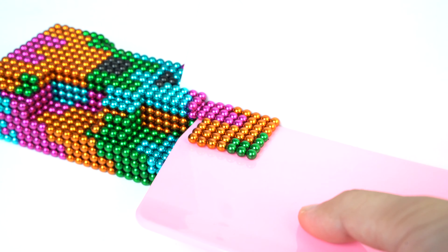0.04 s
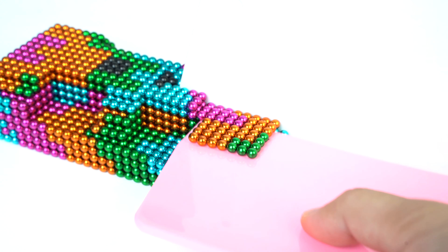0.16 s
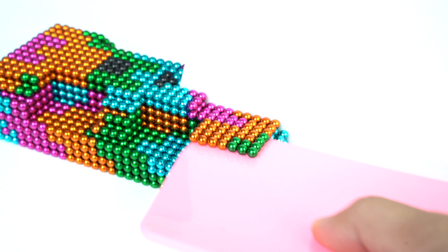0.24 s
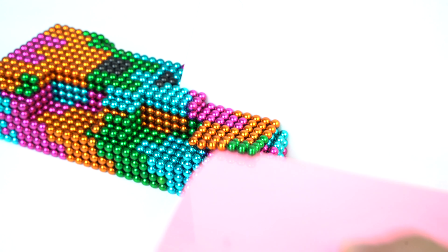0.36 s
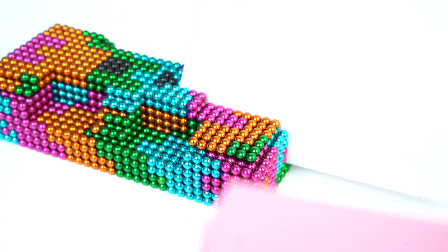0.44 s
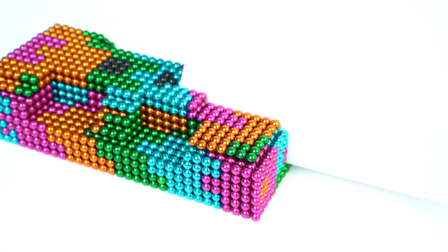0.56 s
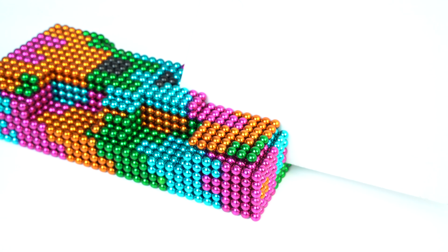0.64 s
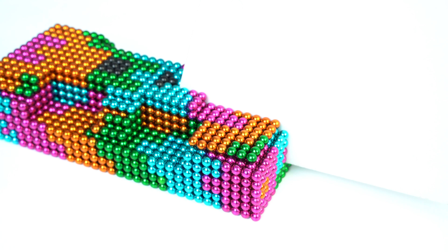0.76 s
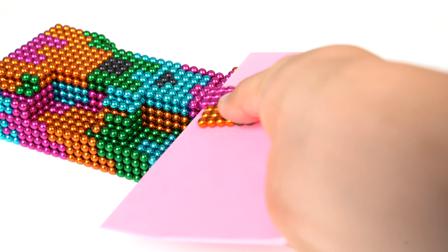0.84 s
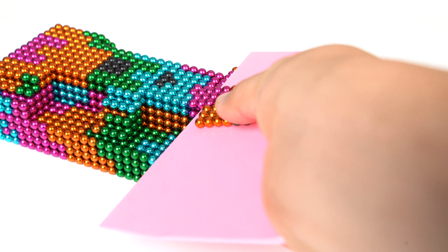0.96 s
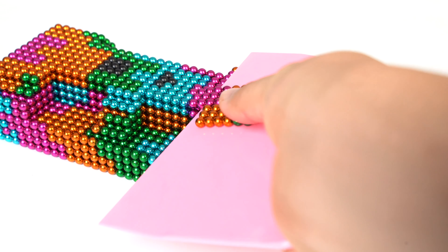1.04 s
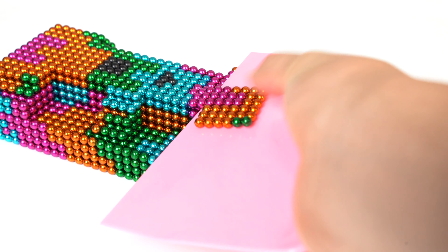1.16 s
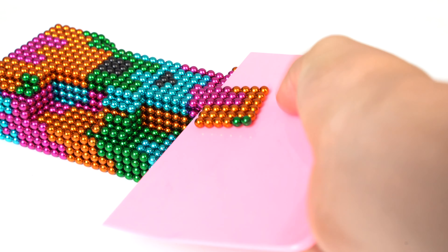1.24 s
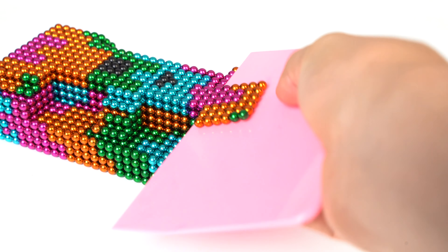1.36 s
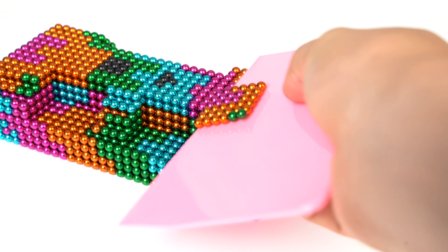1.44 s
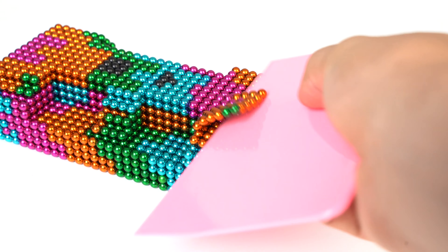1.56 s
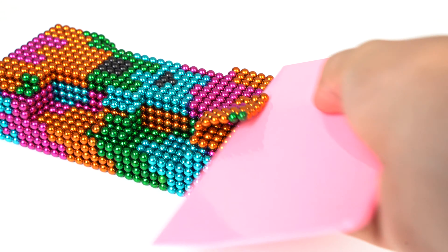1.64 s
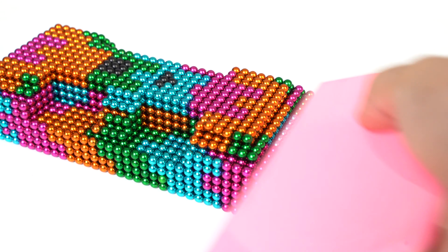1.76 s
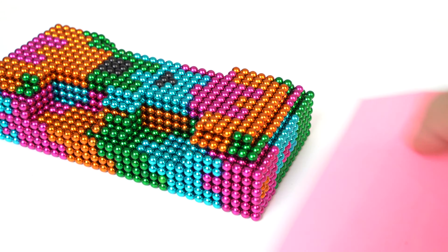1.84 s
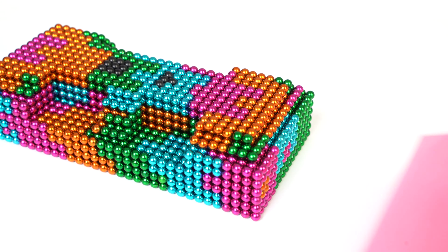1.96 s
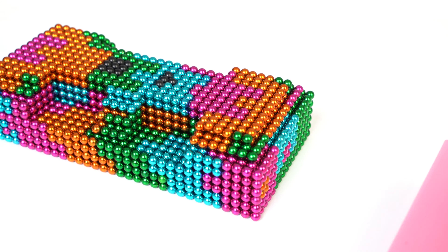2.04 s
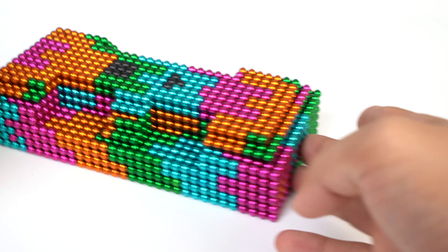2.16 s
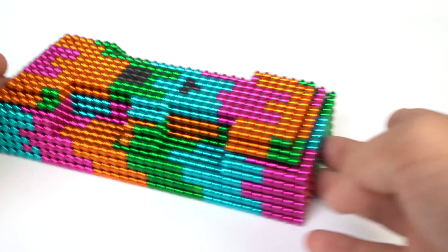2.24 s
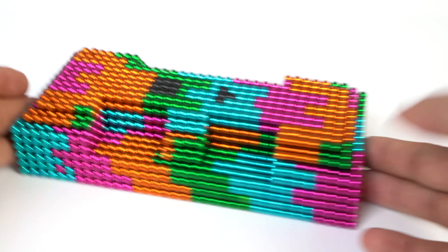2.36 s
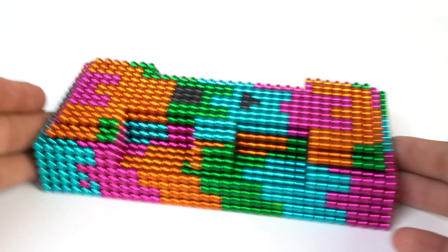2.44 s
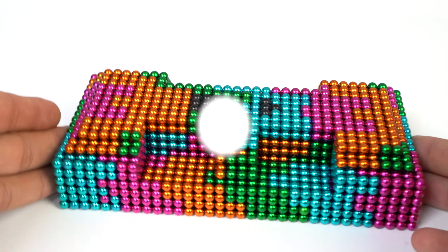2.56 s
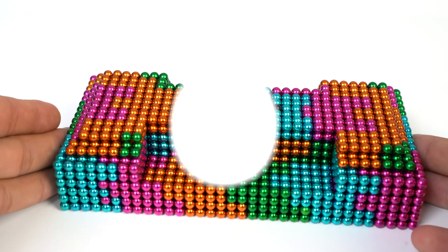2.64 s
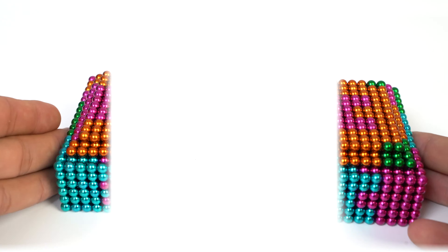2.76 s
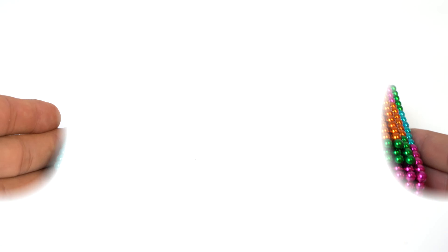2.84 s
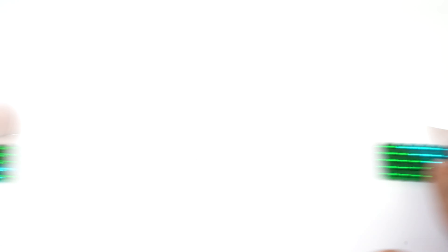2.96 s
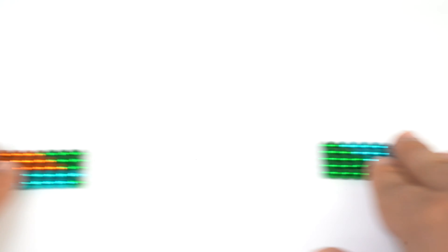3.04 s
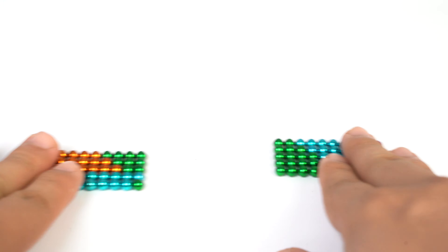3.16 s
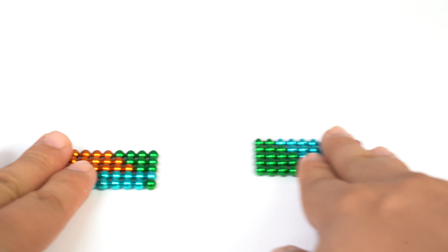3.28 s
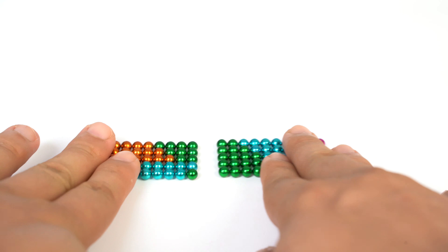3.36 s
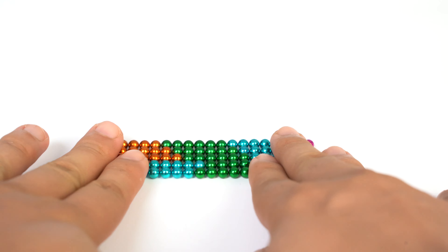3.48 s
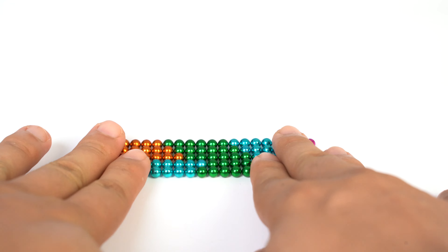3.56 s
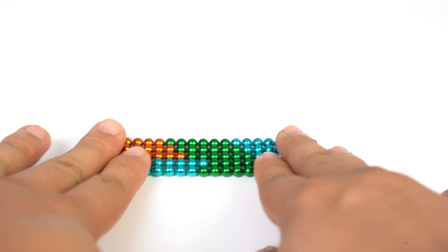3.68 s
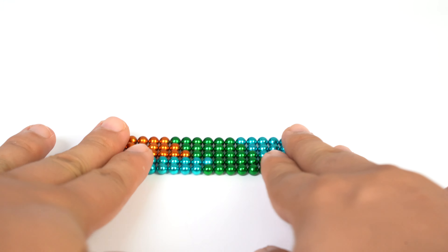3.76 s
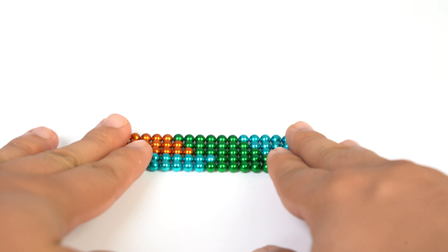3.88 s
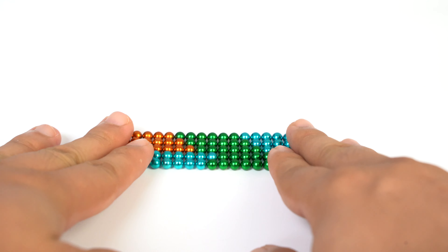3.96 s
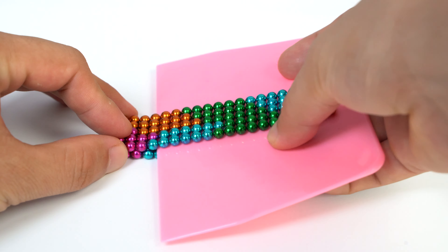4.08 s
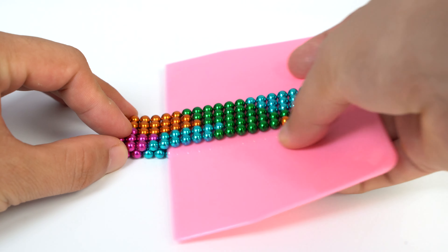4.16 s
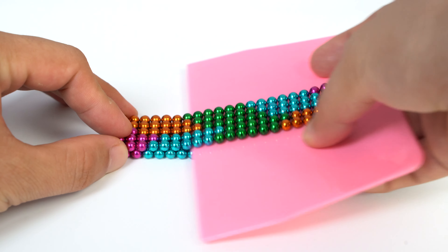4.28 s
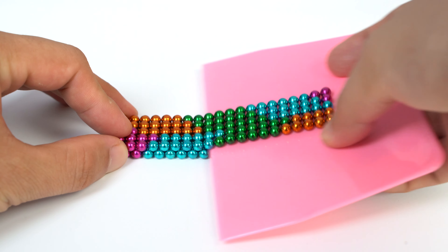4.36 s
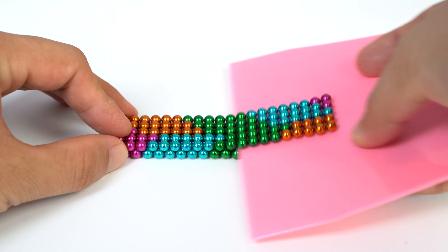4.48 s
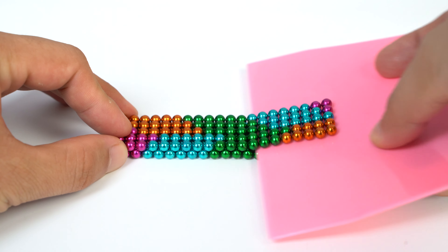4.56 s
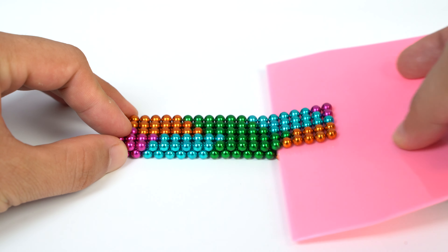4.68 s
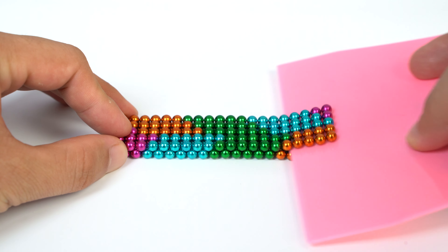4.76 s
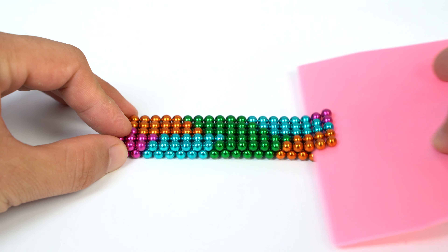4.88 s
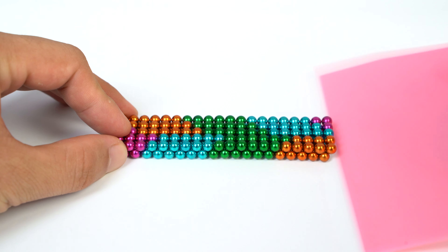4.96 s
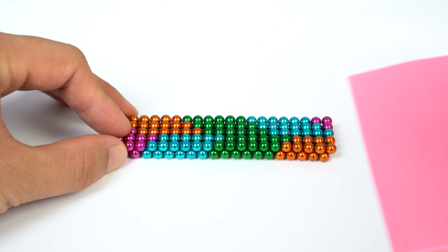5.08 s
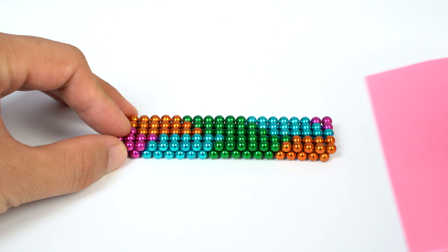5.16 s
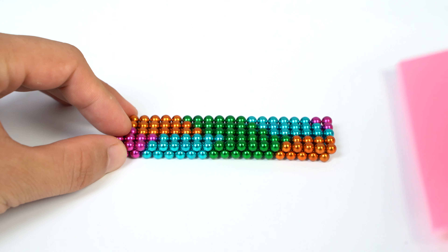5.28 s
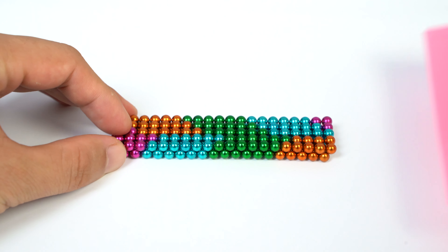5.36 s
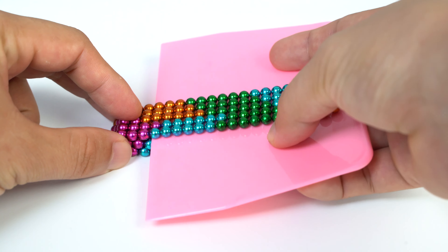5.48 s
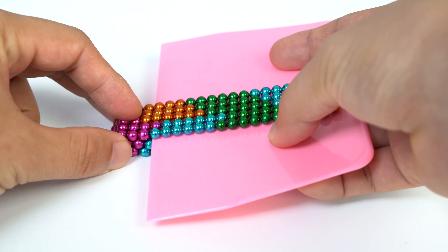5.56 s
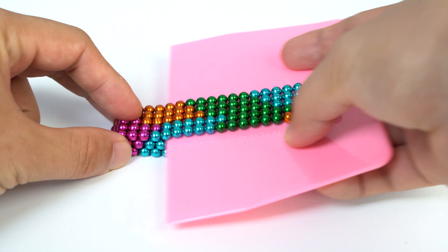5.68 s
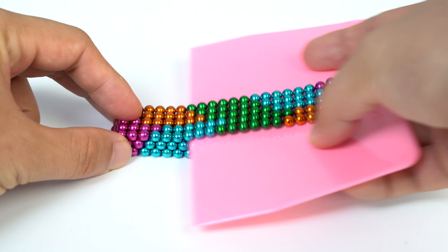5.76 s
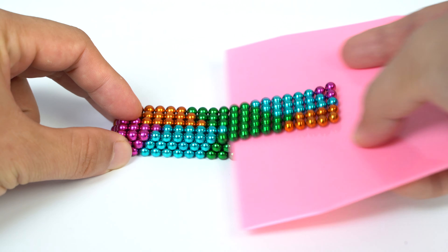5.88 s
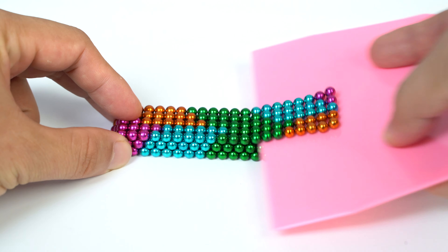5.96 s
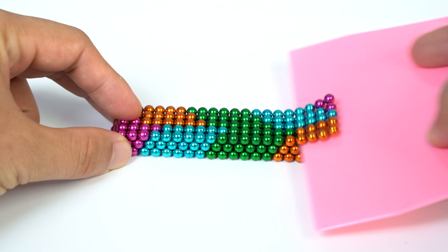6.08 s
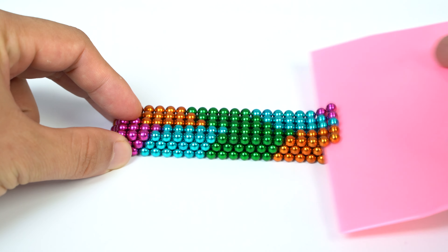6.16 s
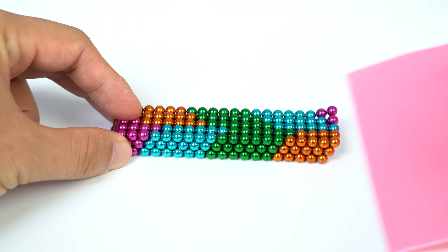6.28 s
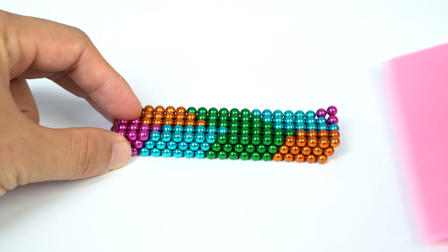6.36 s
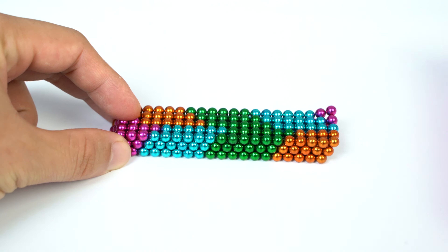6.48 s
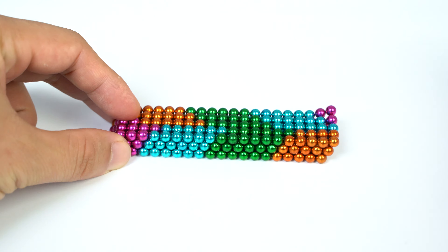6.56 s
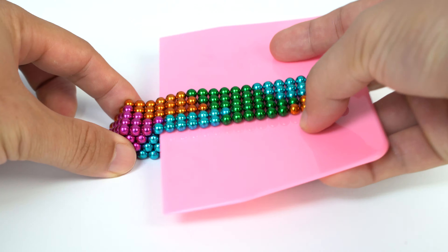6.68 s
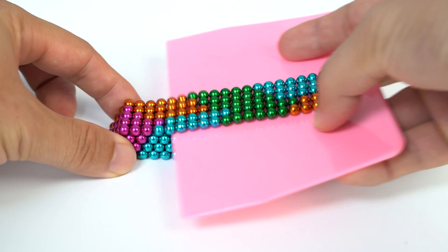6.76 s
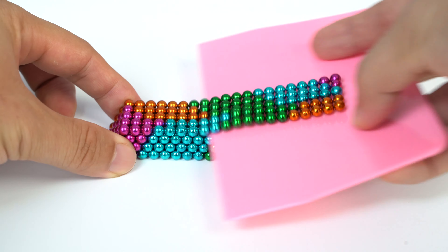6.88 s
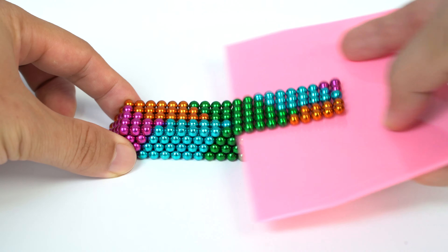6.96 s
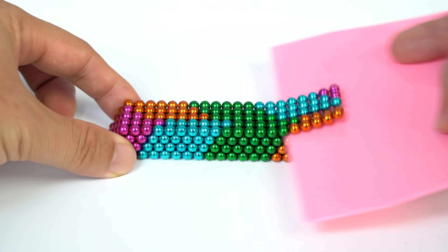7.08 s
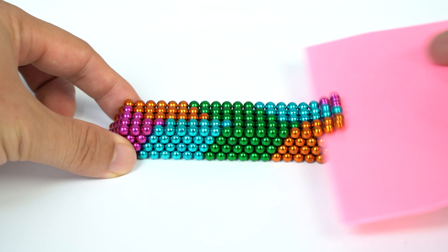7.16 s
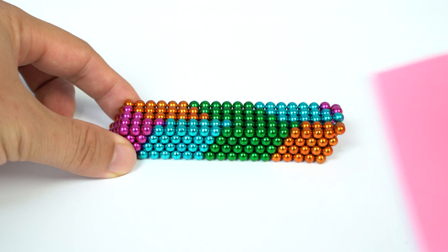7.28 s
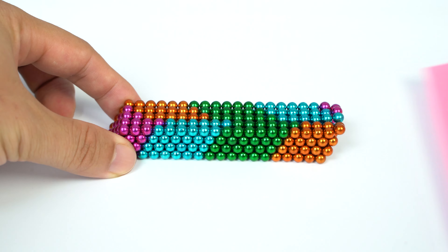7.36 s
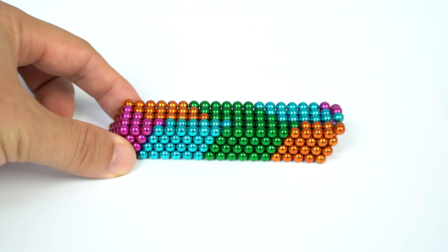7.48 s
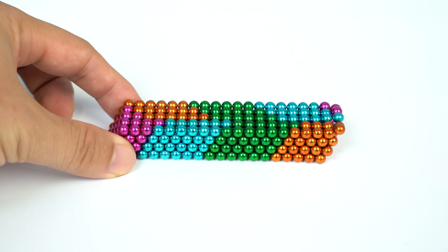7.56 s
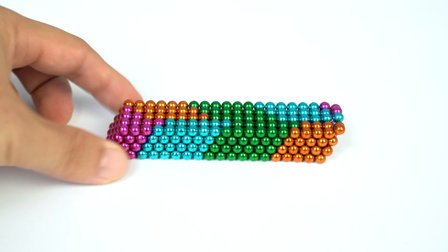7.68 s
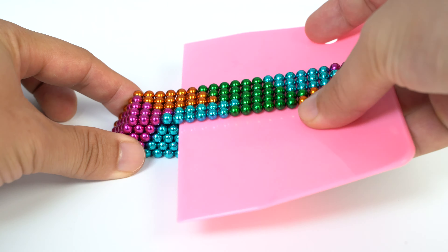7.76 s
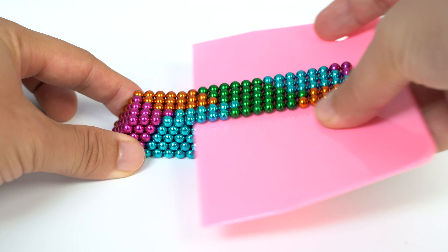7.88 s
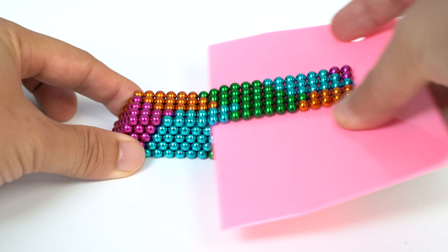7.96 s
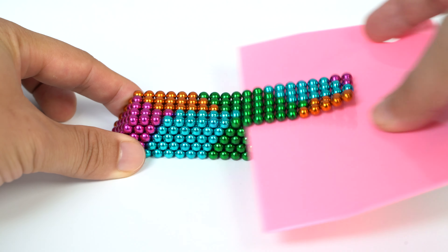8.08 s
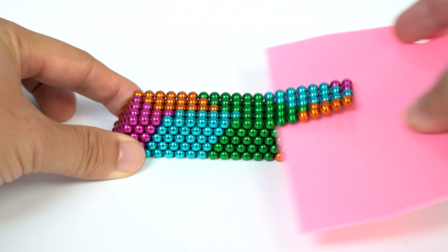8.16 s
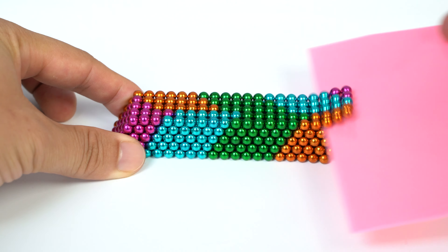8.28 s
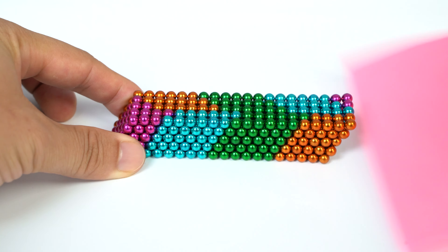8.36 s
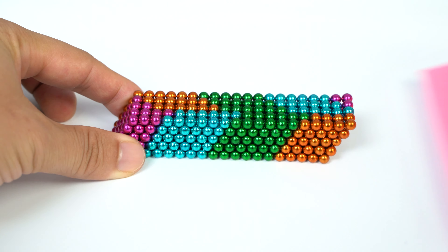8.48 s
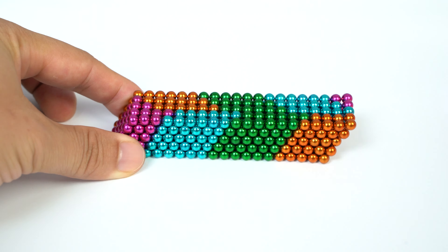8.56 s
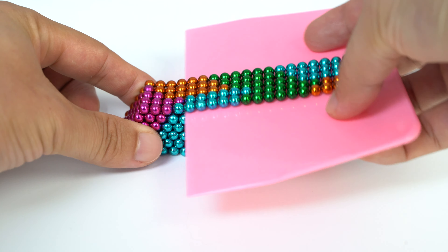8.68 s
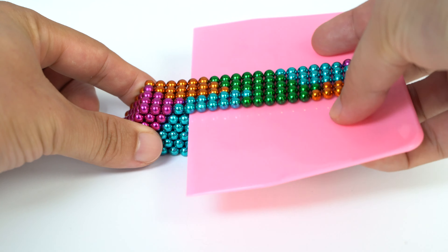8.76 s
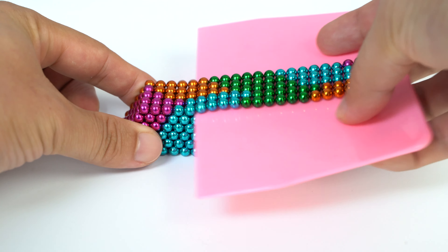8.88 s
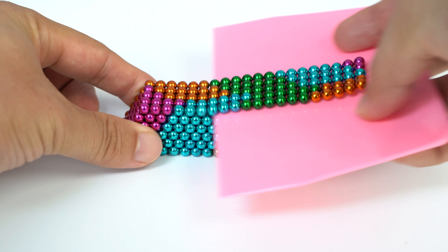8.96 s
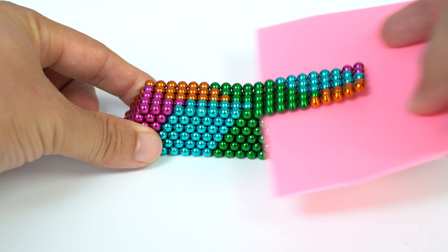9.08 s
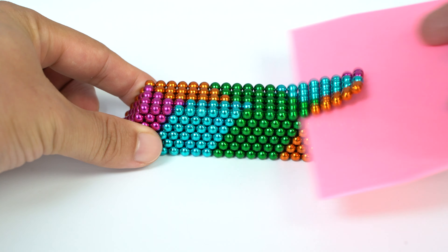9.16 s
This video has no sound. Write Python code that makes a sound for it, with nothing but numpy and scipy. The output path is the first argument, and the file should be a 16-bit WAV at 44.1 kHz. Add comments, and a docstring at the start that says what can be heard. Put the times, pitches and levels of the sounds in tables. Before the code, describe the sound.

A bright plastic-and-steel rattle, very close and dry: a quick ratchet of clicks, a tiny burst, a few lone ticks, another ratchet. A heavy block slides dully over the table, two light strips scrape and click together, then four long dense bursts of snapping balls, a short double clack between the last ones. Small room tail, hard cuts, the loudest snaps slightly distorted.

```python
"""A small room, the microphone close to a table top: layers of small magnetic steel balls and a plastic card.
The card is drawn out from between two layers; row after row snaps shut, ringing card and table (noise bursts
through resonances). Filtered random slips make the block, the two strips and the fingers on the table; noise
through resonances makes the card's edge. Far off, two horns sound as sums of sines, over hiss and deep rumble.
Noise tails make the room's answer; hard edits cut them short and the loudest snaps clip."""
import sys
import numpy as np
from scipy import signal
from scipy.fft import rfft, irfft, next_fast_len
from scipy.io import wavfile
from scipy.ndimage import uniform_filter1d

SR = 44100
rng = np.random.default_rng(int(sys.argv[2]) if len(sys.argv) > 2 else 0)


def to_wav(sig):
    """Store sig (one row per channel, or 1-D mono) as 16-bit WAV at the path in sys.argv[1].

    Samples outside -1..1 are clipped; the rate is SR.
    """
    pcm = np.clip(np.atleast_2d(sig), -1, 1) * 32767
    pcm = np.round(pcm).astype(np.int16)
    wavfile.write(sys.argv[1], SR, pcm.T)  # frames by channels


N = 407043  # length in samples

# The small room by bands: [f/Hz, t60/s, level/dB]
ROOM_BANDS = [(162, 0.74, 7), (278, 0.5, 7), (517.7, 0.58, 4.5), (1190, 0.24, 9), (2610, 0.38, 0),
              (5200, 0.5, -7.5), (9800, 0.41, -9)]
ROOM_DB = -15  # before the level of each section
# Hard edits, start of each section: [t/s]
EDITS = [0, .87, 1.5, 2.152, 2.833, 3.432, 4.075, 5.51, 6.672, 7.85, 8.665, 8.94]
# Room level in each section, the microphone stands nearer or further: [level/dB]
SECTION_ROOM = [-3, -1, -2.5, -3, -1, 0, 1.5, 1.5, 1.5, 0, 0.5, 2]

# Faint hiss of the room, its colour: [f/Hz, level per Hz/dB]
AIR_COLOUR = [(200, -22.5), (800, -2), (3000, -4.5), (16000, -19)]
AIR_DB = -65
# Gaps in the hiss: [start t/s, end t/s]
AIR_GAPS = [(0, .17), (.87, .915), (3.432, 3.5), (4.075, 4.16), (5.51, 5.69), (6.672, 6.76)]

# Deep rumble, its colour: [f/Hz, level per Hz/dB]
RUMBLE_COLOUR = [(20, -29), (70, 5.5), (110, 6), (300, -67)]
# Its slow bed: [t/s, level/dB]
RUMBLE_BED = [(0, -72), (1.7, -80.5), (2.3, -60), (4.1, -72.5), (4.7, -42.5), (5.6, -67), (6.5, -68),
              (7, -93.5), (9.23, -83)]
RUMBLE_PULL_DB = -23.5  # the pulling hand shakes the table

# Two far horns: [start t/s, end t/s, level/dB, fall/dB per s]
HORN_BLASTS = [(6.27, 6.672, -44, 0), (6.672, 6.84, -57, -31)]
# Their overtones before the buzz level and the waver: [multiple of the pitch, level/dB]
HORN_OVERTONES = [(2, -23), (6, -22), (7, -12.5), (8, -7), (9, -10.5), (10, -15.5)]
# Buzz of the overtones, first and second horn: [level/dB]
HORN_BUZZ = [0, -31]
HORN_HZ, SECOND_HORN_HZ, SECOND_HORN_S = 440.5, 393, 6.672

# A short ping with its overtone, the thud of a dropped layer, a hollow knock:
# [t/s, f/Hz, t60/s, level/dB, sag/Hz per s]
SINGLE_RINGS = [(.872, 957, 0.28, -35.5, 2100), (.872, 1670, .3, -51, 500), (1.805, 106, 0.63, -39, 5),
                (8.697, 575, 0.17, -20.5, 39)]

# Resonances of the table top: [f/Hz, width/Hz, level/dB]
TABLE_MODES = [(112, 4.3, -12.5), (226.9, 24, 4.5), (323, 41, -3), (416.2, 16, 0.5), (576.7, 73, -5.5),
               (684, 26, 6), (828.6, 64, 0.5), (970, 13, -20.5), (1210, 51, -9)]
# Resonances of the card, the first being its usual pitch: [f/Hz, width/Hz, level/dB]
CARD_MODES = [(1800, 785, 1), (3327, 500, 2), (4044, 710, 0.5), (6720, 2200, -10.5), (11800, 5000, -37)]
CARD_Q = 5  # sharpness of the lowest mode in a snap
# Resonances of the thick block under the first layers: [f/Hz, width/Hz, level/dB]
BLOCK_MODES = [(378, 70, -6.5), (444, 17, 10.5), (620, 210, -1.5)]
BLOCK_KNOCK_DB = -24.5  # thud against the snap's level
# Layers that close down on the block: [start t/s, end t/s]
ON_BLOCK = [(.2, .5), (1.5, 1.85)]

# Fingers brush the table; a negative fall rises: [start t/s, end t/s, level/dB, fall/dB per s]
FINGER_STROKES = [(3.435, 3.53, -61, -250), (3.76, 4.075, -44, 55), (5.3, 5.52, -52.5, 42),
                  (7.55, 7.85, -63, 64.5)]
# Colour of the finger rub: [f/Hz, level per Hz/dB]
FINGER_COLOUR = [(120, -23.5), (200, -16.5), (318, -17.5), (513, -39), (787, 4), (951, -50), (1360, -5),
                 (1560, -31.5), (12000, -43.5), (15600, -74.5), (22000, -120)]
# The card's edge brushes the table; a negative fall rises: [start t/s, end t/s, level/dB, fall/dB per s]
CARD_STROKES = [(.61, .87, -38, 40), (1.36, 1.5, -63, -13), (5.06, 5.3, -41.5, 14)]
# Resonances of the brushing card: [f/Hz, width/Hz, level/dB]
CARD_SLIDE_MODES = [(1050, 150, -8), (1900, 400, 0), (3150, 400, -2), (4500, 600, -3), (6900, 1100, 0),
                    (11000, 8000, -12)]
# Two strips pushed over the table: [t/s, level/dB]
STRIPS_PUSH = [(2.835, -54), (2.9, -28.5), (2.97, -17), (3.03, -13), (3.13, -15), (3.2, -19), (3.28, -32),
               (3.4, -27), (3.43, -30.5)]
# The strips jerk together and settle: [t/s, level/dB]
STRIPS_JERK = [(3.5, -76), (3.535, -23), (3.56, -29.5), (3.7, -52)]
# Colour of the strips' rub: [f/Hz, level per Hz/dB]
STRIPS_COLOUR = [(59, -71.5), (100, -31.5), (818, -2), (970, -7), (1360, 2.5), (1520, -3.5), (1910, -0.5),
                 (16000, -30.5)]
# The block pushed over the table: [t/s, level/dB]
BLOCK_PUSH = [(2.155, -42), (2.2, -27.5), (2.26, -14.5), (2.33, -11.5), (2.45, -9), (2.58, -12),
              (2.65, -26), (2.72, -63), (2.83, -64)]
# Colour of the block's rub: [f/Hz, level per Hz/dB]
BLOCK_COLOUR = [(35, -73), (60, -52.5), (217, 7), (315, -5), (371, -4), (1280, -21.5), (1440, -27.5),
                (2580, -28), (3580, -41), (16000, -52)]

# Bursts of snaps; tick and knock are at the burst's start, against each snap:
# [start t/s, end t/s, lone balls per s, chatter level at start/dB, chatter level at end/dB,
#  steel tick level/dB, table knock level/dB]
SNAP_BURSTS = [(0.202, 0.497, 520, -38.5, -29.5, 0, -27), (0.916, 0.953, 740, -45, -28, -6, -27.5),
               (1.085, 1.355, 100, -57, -60, -26.5, -33), (1.487, 1.858, 190, -45.5, -56, -10, -26.5),
               (3.528, 3.53, 400, -67, -54, 17.5, -20.5), (4.204, 5.073, 1100, -25.5, -37, -14, -19.5),
               (5.745, 6.31, 350, -18.5, -25, -12, -23.5), (6.851, 7.31, 320, -18, -22.5, -10.5, -21),
               (7.91, 8.424, 350, -19.5, -25.5, -9.5, -20), (8.657, 8.81, 290, -45, -44, -16, -19),
               (8.961, 9.407, 350, -19.5, -36, -11, -21)]
CHATTER_SWELL_S = 0.027
# As the card comes free the snaps get brighter and reach the table harder: rise over each burst
TICK_RISE_DB, KNOCK_RISE_DB, TICK_SCATTER_DB = 9, 7.5, 4.5
# A row of balls snaps shut: [t/s, peak level of the card's ring/dB, card pitch f/Hz]
ROW_SNAPS = [(0.2075, -1.5, 4350), (0.2295, -9.5, 1500), (0.2364, -17, 1620), (0.2978, -11.5, 1400),
             (0.3475, -16.5, 2080), (0.3622, -9.5, 2210), (0.3966, 1.5, 1880), (0.4304, -15, 1670),
             (0.433, -1, 1640), (0.4493, -20, 1690), (0.4631, -2, 1390), (0.4857, -6.5, 1660),
             (0.9323, -1.5, 3800), (0.9371, -6, 3040), (0.9424, 0, 1770), (0.95, -1, 3770),
             (1.1068, -18.5, 1970), (1.2041, -6, 2670), (1.2088, -1.5, 2360), (1.222, -23, 2570),
             (1.2437, -24, 2370), (1.265, -24, 2320), (1.3259, -30, 2150), (1.3405, -13.5, 2420),
             (1.5198, -3, 2120), (1.559, -2.5, 2030), (1.583, -9.5, 1800), (1.5937, -4.5, 1760),
             (1.6091, -11.5, 1710), (1.6413, -4, 1750), (1.6603, -4.5, 1900), (1.713, -10.5, 1660),
             (1.7443, -10.5, 1220), (1.7562, -19, 1690), (1.7805, -4.5, 1220), (1.7915, -7, 1710),
             (1.8051, -4.5, 1210), (1.8175, -0.5, 1120), (1.8265, -8.5, 2380), (3.5349, -15, 1420),
             (4.1794, -29.5, 2100), (4.2129, -3.5, 4000), (4.2291, -1.5, 1960), (4.2758, -4.5, 3800),
             (4.2879, 2, 1950), (4.334, 0, 1780), (4.3426, -1.5, 1970), (4.3869, 4.5, 1740),
             (4.3934, -10, 1720), (4.4432, 0, 1790), (4.4476, -0.5, 1770), (4.4891, 6.5, 1880),
             (4.5008, -9.5, 1820), (4.5317, 5, 3750), (4.5381, -0.5, 1990), (4.5803, 3, 2060),
             (4.6249, 6.5, 3280), (4.6761, 3, 3650), (4.6879, -3, 1720), (4.737, 1.5, 1750),
             (4.747, -6, 1810), (4.811, -0.5, 1274), (4.8173, -2, 1620), (4.8542, -11.5, 2900),
             (4.8783, 1, 1940), (4.936, -6.5, 1890), (4.9403, -3.5, 1300), (4.9471, -1.5, 4060),
             (4.988, 4.5, 4300), (5.039, -2.5, 3730), (5.0454, 5, 1560), (5.7312, -14, 1790),
             (5.7572, 0.5, 3900), (5.7786, -2.5, 3760), (5.7902, -5, 1800), (5.8081, -1, 1830),
             (5.8263, 0, 2040), (5.845, -3, 1800), (5.851, 0, 1730), (5.879, -2, 3600), (5.8854, 0, 3460),
             (5.9178, 0, 1750), (5.925, -3.5, 1730), (5.948, -2, 1800), (5.9514, -1, 3900),
             (5.9716, 0.5, 3940), (5.9775, -2, 1870), (6.0039, 3, 1800), (6.0149, -1.5, 1830),
             (6.0354, 2, 3730), (6.0646, -1, 3780), (6.0743, -5.5, 3980), (6.099, -1, 2130),
             (6.1306, -4, 1280), (6.1649, -3.5, 1120), (6.202, 0.5, 1290), (6.213, -6.5, 1830),
             (6.2464, 4, 4130), (6.29, -5, 1990), (6.7966, -24, 1940), (6.8172, -11, 1370),
             (6.824, -15.5, 2810), (6.8512, 0.5, 1670), (6.872, -5.5, 1540), (6.8944, 0.5, 1800),
             (6.9074, -9, 2440), (6.9297, 0, 1780), (6.9444, 0.5, 1730), (6.9583, 0, 2310),
             (6.9864, 0, 1580), (7.0191, 1.5, 1700), (7.0348, -2, 1660), (7.0464, -2.5, 3850),
             (7.0573, -3.5, 4320), (7.0817, 2, 4700), (7.1074, 0, 1700), (7.1413, -2, 2130),
             (7.1619, -5, 1160), (7.1791, -3.5, 1980), (7.1995, -7, 1800), (7.2246, -1.5, 1380),
             (7.2507, -7, 1950), (7.2651, 0, 1980), (7.2744, -2.5, 2640), (7.2865, -2, 2020),
             (7.8905, -8.5, 3080), (7.9032, -8.5, 2300), (7.9202, -6.5, 2050), (7.9281, -3, 1950),
             (7.974, -5.5, 2010), (7.9872, -0.5, 1950), (7.998, -12, 2640), (8.0267, -10, 2030),
             (8.0486, 2, 1570), (8.09, 1, 2160), (8.117, -2.5, 2180), (8.1324, 2, 4200), (8.1642, 0, 1440),
             (8.1708, -0.5, 1810), (8.2018, 1, 2340), (8.2302, 1.5, 4030), (8.259, 1.5, 1750),
             (8.2734, -8, 1670), (8.2844, -8, 2190), (8.2995, -6, 4020), (8.3114, -11, 4220),
             (8.3268, -0.5, 2950), (8.343, -10, 1410), (8.3572, -2, 2380), (8.3744, -4, 1610),
             (8.385, -4.5, 2500), (8.3974, 0, 3850), (8.4266, -1, 4320), (8.6809, -8, 1580),
             (8.6957, -6, 1860), (8.7843, -10, 2990), (8.9573, -6, 1880), (8.9826, -8, 1710),
             (9.0075, -7.5, 1590), (9.0342, -9, 2160), (9.0507, -0.5, 1650), (9.0736, 3.5, 3780),
             (9.0877, -1.5, 1490), (9.104, 2.5, 1970), (9.1353, 3, 1600), (9.1454, 1.5, 1700),
             (9.1608, -0.5, 1640), (9.182, 0, 1810), (9.2056, 4, 4260), (9.214, -1.5, 1810)]
# Lone clicks; a thumb holds the card, its upper modes are damped: [start t/s, end t/s]
THUMB_SPAN = (1.1, 1.35)
THUMB_OVERTONES_DB = -27

TOP_HZ = 15900  # top of the microphone's band


def undb(db):
    """Amplitude factor of a level in dB."""
    return 10 ** (np.asarray(db) / 20)


def unit(x):
    """Scale to rms 1."""
    return x / np.sqrt(np.mean(x ** 2))


def ring(x, hz, width):
    """One resonance, gain 1 at its centre."""
    centre, sharpness = min(hz, .45 * SR), max(hz / width, .3)
    return signal.lfilter(*signal.iirpeak(centre, sharpness, fs=SR), x)


def body(x, modes):
    """The sum of all resonances of an object, with alternating sign."""
    return sum((-1) ** k * undb(db) * ring(x, hz, width) for k, (hz, width, db) in enumerate(modes))


def gain(tables):
    """Gain over time from (t/s, level/dB) tables; silent outside them."""
    out = np.zeros(N)
    for s, db in (np.transpose(table) for table in tables):
        i = np.arange(int(s[0] * SR), min(int(s[-1] * SR), N))
        out[i] += undb(np.interp(i / SR, s, db))
    return out


def fades(rows):
    """(t/s, level/dB) tables of sounds that fall steadily."""
    return [[(a, db), (b, db - fall_db * (b - a))] for a, b, db, fall_db in rows]


def burst(column, rise_db):
    """(t/s, level/dB) tables: a burst column that moves by rise_db from start to end."""
    return [[(row[0], row[column]), (row[1], row[column] + rise_db)] for row in SNAP_BURSTS]


def colour(x, spectrum):
    """Shape the spectrum to (f/Hz, level/dB) points; rms 1."""
    size = next_fast_len(N)
    hz, db = np.transpose(spectrum)
    f = np.arange(size // 2 + 1) * SR / size + 1
    shape = undb(np.interp(np.log(f), np.log(hz), db))
    return unit(irfft(rfft(x, size) * shape, size)[:N])


def contacts(rate, scatter_db):
    """Random impacts of either sign, rate a second, a few far stronger than the rest."""
    chance = rng.random((3, N))
    struck = chance[0] < rate / SR
    sign = np.sign(chance[1] - .5)
    return struck * sign * undb(-scatter_db * np.log(1 - .96 * chance[2]))


def control(t, points, per_s):
    """Slow random motion: normal draws, per_s a second, joined by straight lines."""
    return np.interp(t, np.arange(points) / per_s, rng.standard_normal(points))


def rub(tables, spectrum, rate, table_db, brighten):
    """Dense slips over a rough surface, part of them rings the table; the treble grows faster with speed."""
    slips = colour(contacts(rate, 0.67), spectrum)
    slips = unit(slips + undb(table_db) * unit(body(slips, TABLE_MODES)))
    dull = signal.sosfiltfilt(signal.butter(2, 1800., fs=SR, output="sos"), slips)
    speed = gain(tables)
    return speed * (dull + (speed / speed.max()) ** brighten * (slips - dull))


def pull():
    """How busy the balls on the card are, as a gain."""
    busy = gain([[(a, db), (b, end_db)] for a, b, _, db, end_db, *_ in SNAP_BURSTS])
    return uniform_filter1d(busy, int(CHATTER_SWELL_S * SR))


def room(table_db=-4):
    """Room response: bands of noise, each with its own decay, after a few ms of travel; the table rings along."""
    t = np.arange(SR // 2) / SR
    tail = 0
    for hz, t60, db in ROOM_BANDS:
        band = unit(ring(rng.standard_normal(len(t)), hz, 0.49 * hz))
        tail = tail + undb(db - 60 * t / t60) * band * np.sqrt(hz / t60)
    tail *= np.clip(t / 0.016, 0, 1) ** 2
    tail += undb(table_db) * body(tail, TABLE_MODES)
    return undb(ROOM_DB) * tail / np.sqrt(np.sum(tail ** 2))


def air():
    """Faint coloured noise of the room, which drops out in the listed gaps."""
    t = np.arange(N) / SR
    heard = 1 - sum((t > a) & (t < b) for a, b in AIR_GAPS)
    return heard * undb(AIR_DB) * colour(rng.standard_normal(N), AIR_COLOUR)


def rumble():
    """Deep noise: a slow bed, and more while the card is pulled."""
    knock = gain(burst(column=6, rise_db=KNOCK_RISE_DB))
    shake = undb(RUMBLE_PULL_DB) * uniform_filter1d(pull() * knock, SR // 10)
    return (gain([RUMBLE_BED]) + shake) * colour(rng.standard_normal(N), RUMBLE_COLOUR)


def horn(waver_db=4.):
    """Far horns: a low tone and a cluster of buzzing overtones; echoes make each waver at random."""
    t = np.arange(N) / SR
    first = t < SECOND_HORN_S
    phase = 2 * np.pi * np.where(first, HORN_HZ, SECOND_HORN_HZ) * t
    sway = control(t, 300, 30)
    buzz = 0
    for k, tone_db in HORN_OVERTONES:
        waver, wander = control(t, 600, 60), control(t, 600, 60)
        buzz = buzz + undb(tone_db + waver_db * waver) * np.sin(k * phase + 1.4 * wander)
    buzz = buzz * undb(np.where(first, *HORN_BUZZ))
    low_tone = undb(waver_db * sway) * np.sin(phase)
    return gain(fades(HORN_BLASTS)) * np.sqrt(2) * (low_tone + buzz)


def rings():
    """Single damped tones whose pitch sags as they die."""
    out = 0
    for s, hz, t60, db, sag in SINGLE_RINGS:
        t = np.clip(np.arange(N) / SR - s, 0, None)
        out = out + undb(db - 60 * t / t60) * np.sin(2 * np.pi * (hz - sag * t / 2) * t)
    return out


def fingers():
    """Fingers brush the table: sparser slips whose treble hardly depends on speed."""
    return rub(fades(FINGER_STROKES), FINGER_COLOUR, 2100.0, -5.5, .05)


def card_slide(flicker_db=-1.0):
    """The card's edge hisses over the table: noise in the card's own resonances, each swelling by itself."""
    t, out = np.arange(N) / SR, 0
    for mode in CARD_SLIDE_MODES:
        swell = control(t, 200, 20)
        hiss = ring(rng.standard_normal(N), *mode[:2])
        out = out + undb(flicker_db * swell) * body(hiss, [mode])
    return gain(fades(CARD_STROKES)) * unit(out)


def strips():
    """Two strips rub over the table in dense slips, then jerk together and settle."""
    push = rub([STRIPS_PUSH], STRIPS_COLOUR, 6000., -7.5, 0.83)
    return push + rub([STRIPS_JERK], STRIPS_COLOUR, 6000., -10.5, .06)


def block():
    """The block rubs over the table in dense slips."""
    return rub([BLOCK_PUSH], BLOCK_COLOUR, 6000., -5.5, 0.36)


def chatter(scatter_db=8.0, table_db=14, tick_db=-14):
    """Lone balls tick at random against card and table, as densely as the latest burst."""
    starts, _, rates = np.transpose(SNAP_BURSTS)[:3]
    latest = np.searchsorted(starts, np.arange(N) / SR) - 1
    rate = rates[np.clip(latest, 0, None)]
    hits = contacts(rate, scatter_db) / np.sqrt(rate)
    card = unit(body(body(hits, CARD_MODES), CARD_MODES))
    tick = undb(tick_db) * unit(ring(hits, 5400.0, 7000.))
    knock = gain(burst(column=6, rise_db=KNOCK_RISE_DB))
    table = undb(table_db) * knock * unit(body(hits, TABLE_MODES))
    return pull() * (card + tick + table)


def stragglers(db=-20, early_s=0.0049, late_s=0.011, rate=1700.0):
    """Some balls of each row land early, more land late or bounce: random hits on the card around each snap."""
    s, row_db = np.transpose(ROW_SNAPS)[:2]
    # in the thumb's span these are lone clicks, without stray balls around them
    loose = (s < THUMB_SPAN[0]) | (s > THUMB_SPAN[1])
    rows = np.bincount((s * SR).astype(int), loose * undb(row_db), N)
    t = np.arange(-2000, 2001) / SR
    spread = np.exp(np.where(t < 0, t / early_s, -t / late_s))
    crowd = signal.fftconvolve(rows, spread, "same")
    return undb(db) * unit(body(contacts(rate, 8.7), CARD_MODES)) * crowd


def snaps(spread_s=0.0019, rise_s=.0004, second_db=-3, push_s=0.00012, tick_s=.0008):
    """The balls of a row land within a few ms: steel ticks, the free end of the card rings, the table knocks."""
    out, t = np.zeros(N + 16384), np.arange(16384) / SR
    push = t * np.exp(-t / push_s)
    knock = body(push, TABLE_MODES)
    knock /= np.abs(knock).max()
    thud = body(push, BLOCK_MODES)
    thud *= undb(BLOCK_KNOCK_DB) / np.abs(thud).max()
    t = t[:1024]
    treble = signal.butter(2, 5000., "high", fs=SR)
    tick_levels = np.vstack(burst(column=5, rise_db=TICK_RISE_DB)).T
    knock_levels = np.vstack(burst(column=6, rise_db=KNOCK_RISE_DB)).T
    for s, db, hz in ROW_SNAPS:
        chance = rng.random((2, 1024))
        # a few strong impacts over a weak dense noise
        balls = ((chance[0] < .08) + .15) * (2 * chance[1] - 1) * (1 - np.exp(-t / rise_s))
        row = balls * np.exp(-t / spread_s)
        # below 2800 Hz all modes follow the free length of the card
        stretch = hz / CARD_MODES[0][0] if hz < 2800 else 1
        modes = np.array(CARD_MODES[:3]) * (stretch, 1, 1)
        held = THUMB_SPAN[0] < s < THUMB_SPAN[1]
        overtones_db = THUMB_OVERTONES_DB if held else second_db
        card = ring(row, hz, hz / CARD_Q) + undb(overtones_db) * body(row, modes)
        card /= np.abs(card).max()
        tick = signal.lfilter(*treble, balls * np.exp(-t / tick_s))
        tick /= np.abs(tick).max()
        tick_db = np.interp(s, *tick_levels) + TICK_SCATTER_DB * rng.standard_normal()
        knock_db = np.interp(s, *knock_levels)
        on_block = any(a < s < b for a, b in ON_BLOCK)
        i = int((s - rise_s) * SR)
        out[i:i + 1024] += undb(db) * (card + undb(tick_db) * tick)
        out[i:i + 16384] += undb(db + knock_db) * knock + on_block * undb(db) * thud
    return out[:N]


def scene():
    """Near sounds with the room's answer, over far horns, hiss, single rings and rumble."""
    near = fingers() + card_slide() + strips() + block()
    near = near + chatter() + stragglers() + snaps()
    out, response = near + horn() + air(), room()
    edges = [int(s * SR) for s in EDITS] + [N]
    for a, b, room_db in zip(edges[:-1], edges[1:], SECTION_ROOM):  # no room tail reaches over an edit
        out[a:b] += undb(room_db) * signal.fftconvolve(near[a:b], response)[:b - a]
    # the microphone picks up little below 150 Hz; rings and rumble are set at their heard level
    out = signal.sosfilt(signal.butter(4, 150., "high", fs=SR, output="sos"), out)
    return (out + rings() + rumble())[None]


def record(dry):
    """Full scale clips; then a steep low-pass cuts the top."""
    low_pass = signal.ellip(12, .3, 90, TOP_HZ, fs=SR, output="sos")
    return signal.sosfilt(low_pass, np.clip(dry, -1, 1))


dry = scene()
out = record(dry)
to_wav(out)
```